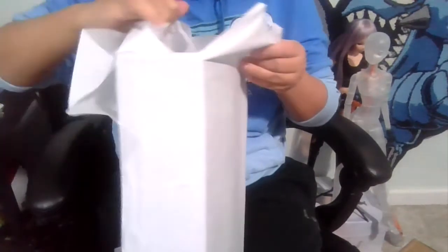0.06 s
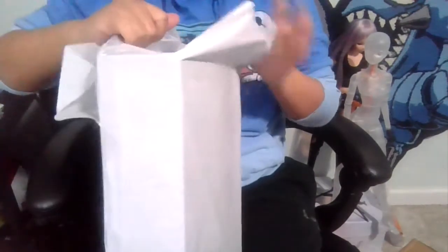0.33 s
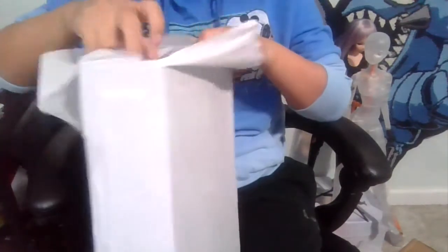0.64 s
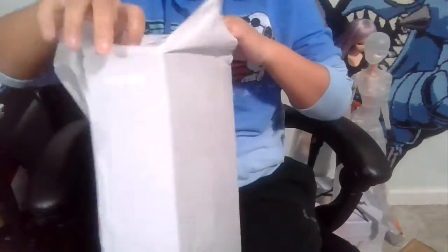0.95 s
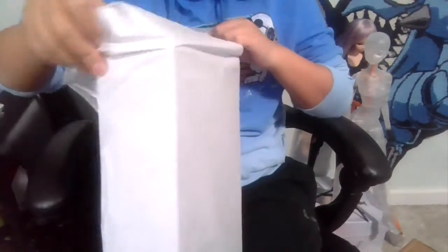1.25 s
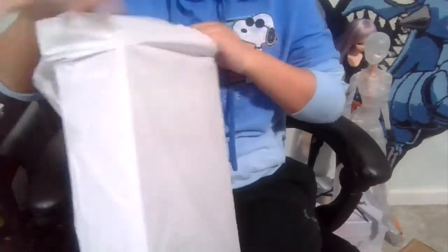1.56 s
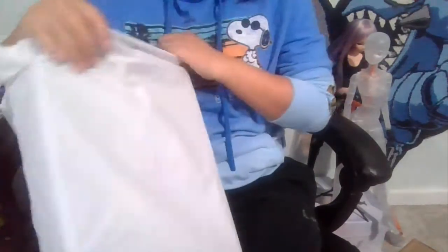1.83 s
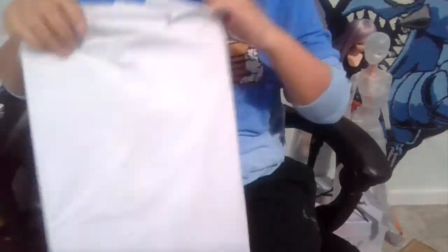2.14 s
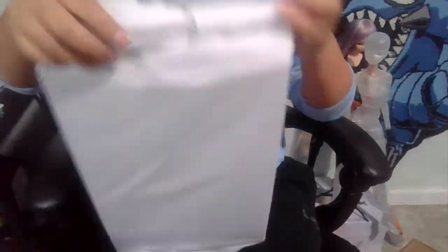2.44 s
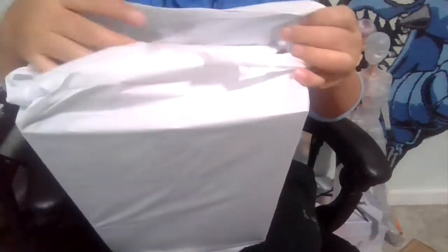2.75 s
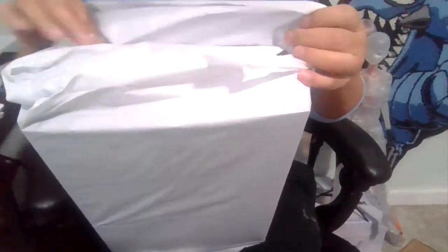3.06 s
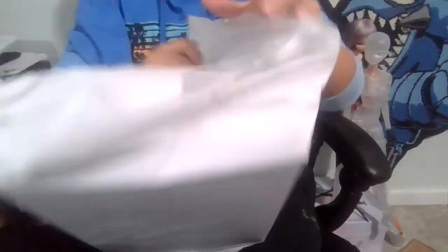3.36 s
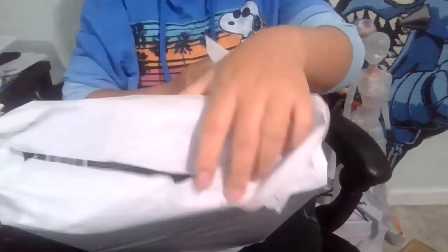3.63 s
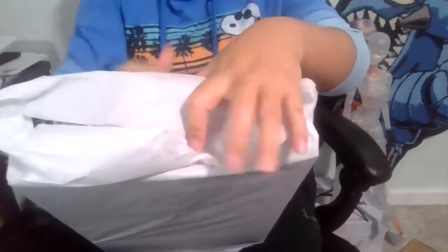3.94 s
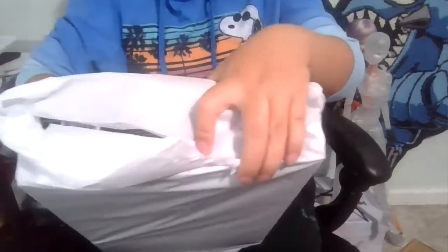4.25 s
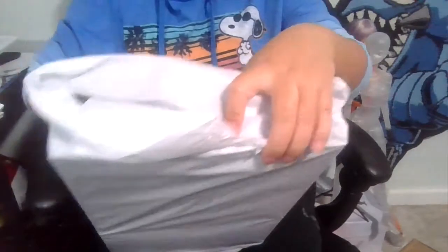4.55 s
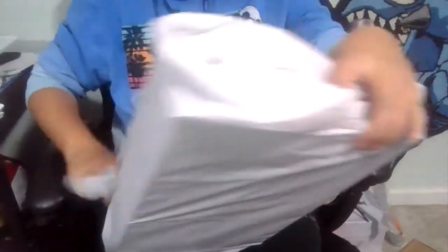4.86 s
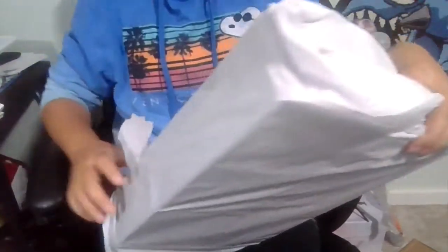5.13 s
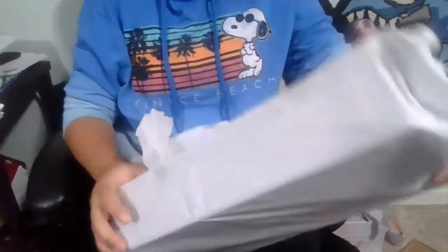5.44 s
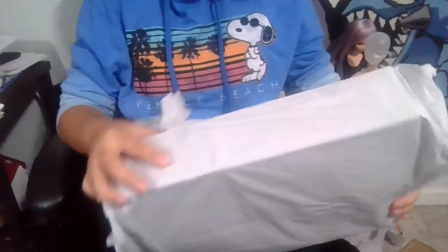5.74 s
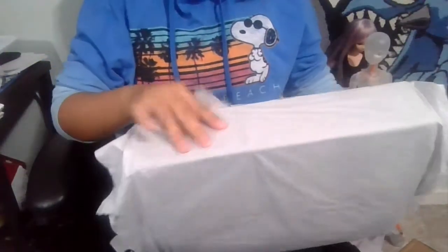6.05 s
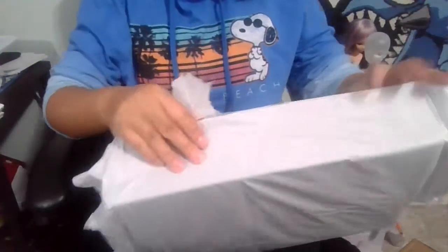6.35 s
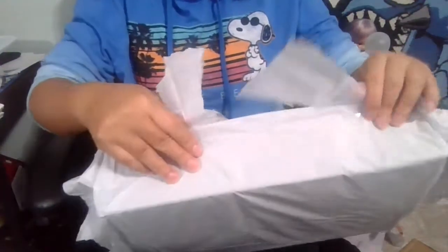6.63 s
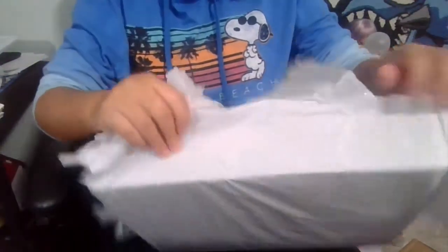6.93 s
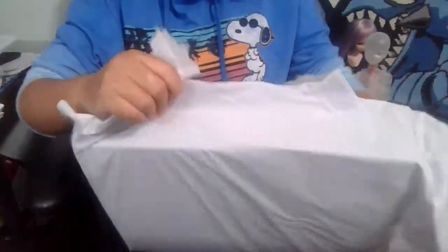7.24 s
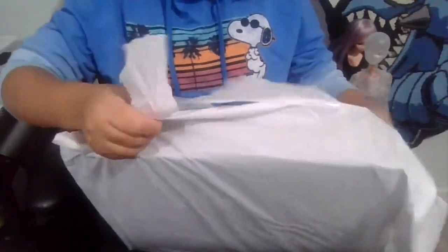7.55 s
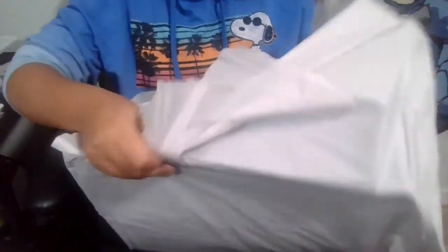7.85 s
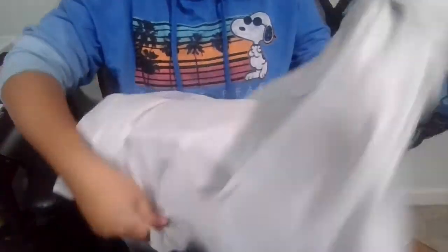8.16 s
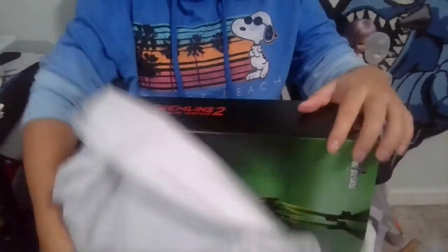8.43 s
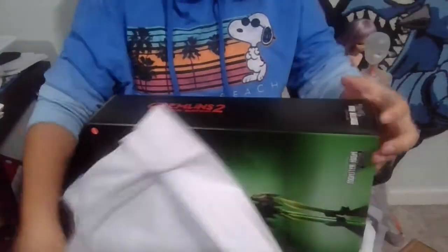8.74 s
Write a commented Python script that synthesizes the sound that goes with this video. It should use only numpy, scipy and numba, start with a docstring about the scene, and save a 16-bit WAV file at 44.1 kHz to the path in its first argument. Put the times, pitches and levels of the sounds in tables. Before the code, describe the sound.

Thin wrapping paper rustles in short, uneven strokes as hands work it off a cardboard box, close to a computer microphone in a small room. Over the first 2.7 seconds it crinkles and slides, with hollow hand bumps near 1 and 1.4 seconds and a sharp fold snap near 1.7. After a brief lull, the loudest crunching comes from 3.1 to 3.7 seconds, ending in several sharp snaps and a knock. The rustling then thins out, almost stopping around 5 seconds, with soft bumps as the box is turned. Crisp strokes and small snaps pick up again from about 5.5 seconds. A firm hollow thump lands at 7.3, followed by fuller, nearly continuous rustling with a snap at 7.8, easing off after 8.6 seconds. Faint steady room noise lies underneath throughout.

```python
"""Thin wrapping paper rustles as hands pull it off a cardboard box.
Each stroke buckles a swarm of tiny creases and drags paper over paper; loose flaps and the box ring along.
Single folds snap, and the hands bump the hollow box as they turn it.
A close computer microphone picks this up in a small room with faint steady noise."""
import sys
import numpy as np
from scipy import signal
from scipy.fft import rfft, irfft
from scipy.io import wavfile
from scipy.ndimage import uniform_filter1d
from numba import njit

SR = 44100
rng = np.random.default_rng(int(sys.argv[2]) if len(sys.argv) > 2 else 0)


def digitize_waveform(pressure):
    """Quantize a signal to 16-bit integers and store it at the path in sys.argv[1].

    Rows of a 2-D input are taken as channels; values are limited to [-1, 1].
    """
    field = np.atleast_2d(pressure).T
    bounded = np.clip(field, -1, 1)
    quanta = np.round(bounded * 32767).astype(np.int16)
    wavfile.write(sys.argv[1], SR, quanta)


N = 392049
T = np.arange(N) / SR
HZ = np.maximum(np.arange(N + 1) * SR / (2 * N), 1)


def undb(db):
    """Decibels to gain."""
    return 10 ** (np.asarray(db) / 20)


def unit(x):
    """Scale to rms 1."""
    return x / np.sqrt(np.mean(x ** 2))


def steady(x):
    """Level to unit power over a sliding 41 ms window."""
    return x / np.sqrt(np.abs(uniform_filter1d(x ** 2, size=1800)) + 1e-9)


def walk(rate_hz):
    """Random levels joined by lines; spread near 1."""
    return np.interp(T * rate_hz, np.arange(4096), rng.standard_normal(4096))


def add(out, start_s, sound):
    """Mix a sound in at start_s."""
    i = max(int(start_s * SR), 0)
    out[i:i + len(sound)] += sound[:N - i]


def blend(a, b, db):
    """Constant-power mix, b lying db over a."""
    return (a + undb(db) * b) / np.hypot(1, undb(db))


def spectrum(points):
    """Interpolate (f/Hz, level/dB) points onto HZ."""
    hz, db = np.transpose(points)
    return np.interp(np.log(HZ), np.log(hz), db)


def colour(x, gain_db):
    """Minimum-phase filter, gain_db given on HZ."""
    cepstrum = irfft(np.log(undb(gain_db)))
    cepstrum[1:N] *= 2
    cepstrum[N + 1:] = 0
    return irfft(rfft(x, 2 * N) * np.exp(rfft(cepstrum)))[:N]


def split(x, edges_hz):
    """Adjacent bands, each levelled to unit power."""
    bands = []
    for hz in edges_hz:
        low = signal.sosfiltfilt(signal.butter(6, hz, fs=SR, output="sos"), x)
        bands.append(steady(low))
        x = x - low
    return bands + [steady(x)]


@njit
def resonate(x, centre_hz, width_hz):
    """State-variable band-pass, gain 1 at its moving centre."""
    y, band_state, low_state = np.empty(len(x)), 0., 0.
    for i in range(len(x)):
        g, damping = np.tan(np.pi * centre_hz[i] / SR), width_hz / centre_hz[i]
        band = (band_state + g * (x[i] - low_state)) / (1 + g * (g + damping))
        band_state = 2 * band - band_state
        low_state += 2 * g * band
        y[i] = damping * band
    return y


def shifting_ring(x, ring_s, hop_samples):
    """Short random resonances that change with movement, each set fading into the next."""
    out, t = np.zeros(N), T[:3072]
    fade = np.sin(np.pi * np.arange(2 * hop_samples) / (2 * hop_samples))
    for i in range(0, N, hop_samples):
        ring = rng.standard_normal(len(t)) * np.exp(-t / ring_s)
        piece = x[i:i + 2 * hop_samples]
        add(out, i / SR, signal.fftconvolve(piece * fade[:len(piece)], ring / np.linalg.norm(ring)))
    return out


def burst(t, ring_s, gain):
    """Decaying noise burst, peak 1, filtered by a gain given on HZ."""
    noise = rng.standard_normal(len(t)) * t * np.exp(-t / ring_s)
    bins_hz = np.fft.rfftfreq(len(t), 1 / SR)
    shaped = irfft(rfft(noise) * np.interp(bins_hz, HZ, gain))
    return shaped / np.abs(shaped).max()


# room noise spectrum: f/Hz, level/dB
NOISE_SPECTRUM = [(60, -33), (160, -3.5), (400, -12.5), (3000, -18), (7600, -19.5)]


def room_noise(level_db):
    """Steady low rush with faint hiss."""
    return undb(level_db) * unit(colour(rng.standard_normal(N), spectrum(NOISE_SPECTRUM)))


def room_echo(x, decay_s, wet_db):
    """Desk and near walls add a short echo that shifts as the box moves."""
    return x + undb(wet_db) * shifting_ring(x, decay_s, hop_samples=5000)


# response of the wrapped box: f/Hz, level/dB
PARCEL_SPECTRUM = [(60, -36.5), (110, -23.5), (170, -6), (260, -1.5), (520, 0), (700, -4.5), (860, -10),
                   (1040, -4.5), (1400, -6.5), (1560, -11), (1850, -8.5), (2750, -9.5), (3700, -0.5),
                   (7400, -4)]
# flap and crease resonances: f/Hz, width/Hz, level/dB
SHEET_MODES = [(1311, 250, 7.5), (2190, 510, 12), (6250, 2860, 10.5)]


def bending_sheet(x, wander_octaves, bend_rate_hz):
    """The wrapped box colours x; each resonance wanders on its own as the paper bends."""
    x = colour(x, spectrum(PARCEL_SPECTRUM))
    for hz, width_hz, db in SHEET_MODES:
        centre_hz = hz * 2 ** (wander_octaves * walk(bend_rate_hz))
        x = x + (undb(db) - 1) * resonate(x, centre_hz, float(width_hz / undb(db / 2)))
    return x


def parcel_gain():
    """Gain of the wrapped box on HZ, resonances held still."""
    modes_db = sum(db / (1 + (2 * (HZ - hz) / width_hz) ** 2) for hz, width_hz, db in SHEET_MODES)
    return undb(spectrum(PARCEL_SPECTRUM) + modes_db)


def box_jolt(start_s, level_db, hz, decay_s):
    """The strongest bump knocks the desk and microphone: one deep, quickly damped thud."""
    t = np.maximum(T - start_s, 0)
    return undb(level_db) * t / decay_s * np.exp(1 - t / decay_s) * np.sin(2 * np.pi * hz * t)


# hand bumps on the box: t/s, level/dB, wall f/Hz, knuckle hardness/dB
BOX_BUMPS = [(0.23, -28, 171, 2), (0.964, -14.5, 256, -1), (1.311, -20, 410, 6), (1.365, -14, 362, -2),
             (1.445, -30, 187, 0), (1.749, -31, 165, -6), (1.896, -23, 250, 5), (2.356, -26.5, 178, -9),
             (3.666, -17.5, 227, -3), (3.712, -24.5, 193, -10), (3.872, -29.5, 160, -18),
             (4.14, -25.5, 230, -6), (4.78, -30, 161, -14), (5.081, -32.5, 163, -21),
             (5.34, -27.5, 240, -10), (5.607, -28, 260, -7), (5.714, -21.5, 557, -5),
             (6.298, -31, 152, -12), (6.321, -34, 160, -14), (6.528, -27, 220, 1), (6.603, -32, 158, -9),
             (7.136, -23.5, 287, -4), (7.272, -13.5, 376, -0.5), (8.727, -30, 159, -12)]


def box_bumps(cycles, bend, knock_s, knock_hz, shudder_s, shudder_hz, shudder_db):
    """A hand swings a cardboard wall and damps it; a knuckle knocks; the box shudders on."""
    out, t, parcel = np.zeros(N), T[:4096], parcel_gain()
    knock_gain = parcel / np.hypot(1, (HZ / knock_hz) ** 2)
    shudder_gain = parcel / np.hypot(1, (HZ / shudder_hz) ** 2)
    for start_s, level_db, wall_hz, hard_db in BOX_BUMPS:
        swings = cycles * undb(-0.17 * hard_db)  # longer under a soft palm
        age = np.minimum(t * wall_hz / swings, 1)
        pitch_hz = wall_hz * (1 + bend * (rng.random() - .5) * np.cos(np.pi * age))
        wall = np.sin(np.pi * age) ** 2 * np.sin(2 * np.pi * (np.cumsum(pitch_hz) / SR + rng.random()))
        knock = undb(hard_db) * burst(t, knock_s, knock_gain)
        shudder = undb(shudder_db) * burst(t, shudder_s, shudder_gain)
        add(out, start_s, undb(level_db) * (wall + knock + shudder))
    return out


# snapping folds: t/s, level/dB, f/Hz
FOLD_SNAPS = [(0.032, -22, 2040), (0.323, -28, 1800), (0.724, -12, 5000), (0.967, -21, 1150),
              (1.123, -17, 4200), (1.669, -8.5, 1710), (2.946, -28.5, 5970), (3.525, -6, 2250),
              (3.545, -3, 2170), (3.668, 0.5, 2730), (4.182, -12, 4060), (5.66, -21.5, 2800),
              (6.095, -18, 6460), (6.231, -22.5, 5960), (6.527, -14.5, 4570), (6.59, -23, 2140),
              (6.743, -13, 3000), (7.332, -13, 2270), (7.506, -20, 4340), (7.795, -5.5, 4600)]


def fold_snaps(ring_s, width_octaves, gain_db):
    """A stiff fold flips through: a few milliseconds of noise around its own pitch."""
    out, parcel = np.zeros(N), parcel_gain()
    for peak_s, level_db, pitch_hz in FOLD_SNAPS:
        gain = parcel / (1 + (np.log2(HZ / pitch_hz) / width_octaves) ** 2)
        add(out, peak_s - ring_s, undb(level_db + gain_db) * burst(T[:1024], ring_s, gain))
    return out


def sliding(rough_db, slip_rate_hz):
    """Paper drags over paper in small uneven slips."""
    return unit(rng.standard_normal(N) * undb(rough_db * walk(slip_rate_hz)))


def buckling(rate_hz, spread_db):
    """Creases buckle at random: many small clicks, few large ones."""
    chance = rng.random(N) * SR / rate_hz
    sign = np.sign(rng.standard_normal(N))
    size = undb(spread_db * np.minimum(-np.log(chance + 1e-9), 5))
    return unit((chance < 1) * sign * size / np.sqrt(rate_hz))


def crease_ticks(rate_hz, spread_db, ring_s, low_hz, high_hz):
    """Single stiff creases flip, each a tiny ping at its own pitch."""
    out, t = np.zeros(N), T[:256]
    clicks = buckling(rate_hz, spread_db)
    pitch_hz = low_hz + (high_hz - low_hz) * rng.random(N)
    ring = t * np.exp(-t / ring_s)
    for i in np.flatnonzero(clicks):
        add(out, T[i], clicks[i] * ring * np.sin(2 * np.pi * pitch_hz[i] * t))
    return unit(out)


def stroke_envelope(t, swell_s, hold_s):
    """Fingers catch the paper at t = 0; the pull swells, slackens and lets go; the paper settles."""
    catch_db, swell_db, slacken_db = 4, 13, 4
    release_db_per_s, settle_db, settle_db_per_s = 513, -10.5, 78
    gather_db = swell_db * np.minimum(t / swell_s - 1, 0) - catch_db * (t < 0)
    slack_db = slacken_db * np.clip((t - swell_s) / hold_s, 0, 1)
    free_s = np.maximum(t - swell_s - hold_s, 0)
    release = np.hypot(undb(-release_db_per_s * free_s), undb(settle_db - settle_db_per_s * free_s))
    return undb(gather_db - slack_db) * release / release[0]


# hand strokes: t/s, swell/s, hold/s, level/dB, box coupling/dB,
# crispness (creases over flaps)/dB, flap size (wide over narrow)/dB
HAND_STROKES = [(0.006, 0.038, 0.058, -28.5, -13, 1.5, -6.5), (0.12, 0.022, 0.1, -28.5, -10, 2, -7),
                (0.314, 0.015, 0.1, -34.5, -11.5, 3, 0.5), (0.56, 0.026, 0.016, -34.5, -11.5, 4, 2),
                (0.668, 0.071, 0.11, -21.5, -11.5, 6.5, -1.5), (0.873, 0.033, 0.21, -35, -8, -0.5, 0.5),
                (1.005, 0.11, 0.026, -24.5, -13.5, 6, -3), (1.145, 0.032, 0.023, -22.5, -7.5, 1.5, 1.5),
                (1.212, 0.079, 0.13, -26.5, -9.5, 2, 1.5), (1.45, 0.27, 0.024, -32.5, -8.5, 1, 3.5),
                (1.632, 0.034, 0.056, -23.5, -11, -0.5, 8), (1.801, 0.019, 0.11, -25.5, -4.5, 1, 8),
                (1.942, 0.027, 0.082, -37.5, -4.5, -1.5, 14), (2.056, 0.073, 0.22, -30.5, -9.5, 5, 6),
                (2.265, 0.17, 0.13, -26, -7, 1, 2.5), (2.545, 0.056, 0.082, -21.5, -6, -2.5, -2),
                (2.728, 0.0087, 0.04, -34, -2.5, -4, -6), (2.919, 0.061, 0.094, -46.5, -14, 6, -10),
                (3.097, 0.014, 0.046, -24, -6.5, -2.5, -3.5), (3.196, 0.03, 0.049, -18, -7, 0.5, -1),
                (3.274, 0.028, 0.025, -19.5, -10, -5, -7), (3.318, 0.057, 0.095, -25, -6, -0.5, 10.5),
                (3.372, 0.094, 0.077, -16.5, -14, 1.5, -7), (3.538, 0.015, 0.032, -17, -3.5, 5, -4.5),
                (3.628, 0.034, 0.0042, -15.5, -10, 0.5, -3), (3.718, 0.12, 0.082, -27, -15.5, 9, -5),
                (3.929, 0.022, 0.047, -22.5, -17, 7, -6), (4.096, 0.02, 0.093, -26.5, -14, 7, -10),
                (4.318, 0.096, 0.046, -26.5, -4.5, 1, -0.5), (4.528, 0.018, 0.09, -35, -4.5, 3, -3),
                (4.684, 0.028, 0.015, -32, -4.5, 1, -3), (4.807, 0.009, 0.03, -26, -6.5, 6.5, -4),
                (4.843, 0.041, 0.042, -32, -11, 5.5, 3), (5.261, 0.014, 0.1, -43.5, -13, 7, -4),
                (5.409, 0.037, 0.02, -33.5, -13, 6, -8.5), (5.551, 0.05, 0.035, -31.5, -3, 7.5, -4),
                (5.656, 0.036, 0.022, -24.5, -11, 3, 3), (5.828, 0.14, 0.084, -37.5, -8.5, 2.5, -0.5),
                (6.048, 0.023, 0.083, -30.5, -12, 5, -1.5), (6.164, 0.022, 0.057, -41, -7, 17, 2),
                (6.23, 0.061, 0.026, -28, -14, 5.5, -6), (6.442, 0.071, 0.026, -27.5, -6, 4, -3),
                (6.572, 0.017, 0.071, -31, -12.5, 7, -8), (6.674, 0.058, 0.11, -30, -8.5, 3, -5.5),
                (6.879, 0.019, 0.079, -28.5, -7.5, 5, -2), (6.968, 0.065, 0.09, -24, -13, 4, 1.5),
                (7.195, 0.014, 0.11, -31.5, -7, -2.5, 4.5), (7.251, 0.034, 0.07, -24, -9.5, 1.5, -7),
                (7.363, 0.014, 0.073, -28, -6, 4.5, -3.5), (7.458, 0.051, 0.078, -22, -10.5, 7.5, 1),
                (7.612, 0.05, 0.098, -21, -7, 3.5, -1.5), (7.743, 0.046, 0.071, -21.5, -11, 4.5, -3),
                (7.882, 0.11, 0.15, -25, -13.5, 6, -1), (8.135, 0.098, 0.14, -21.5, -13, 5.5, -1.5),
                (8.364, 0.068, 0.11, -20.5, -8.5, 1.5, 1.5), (8.54, 0.09, 0.036, -27, -9, 2.5, -2),
                (8.751, 0.22, 0.039, -36.5, -10.5, 2, 4)]
# paper stirring under resting hands: level/dB, box coupling/dB, crispness/dB, flap size/dB
HANDS_AT_REST = (-59.5, -8.5, 8, -5)


def hands():
    """Level and grip (coupling, crispness, flap size) in dB; strokes add in power, which weights grip."""
    t = np.arange(0, T[-1], .001)
    rest_db, *rest_grip = HANDS_AT_REST
    power = np.full(len(t), undb(rest_db) ** 2)
    grip = np.outer(rest_grip, power)
    for start_s, swell_s, hold_s, level_db, *stroke_grip in HAND_STROKES:
        stroke_power = (undb(level_db) * stroke_envelope(t - start_s, swell_s, hold_s)) ** 2
        power += stroke_power
        grip += np.outer(stroke_grip, stroke_power)
    return [np.interp(T, t, control) for control in (10 * np.log10(power), *(grip / power))]


def paper_rustle():
    """Buckling and sliding sound through box, flaps and creases; stiff creases tick on top."""
    stroke_db, box_db, crisp_db, wide_db = hands()
    rate_hz = 1600 * undb(.5 * (stroke_db + 28.5))  # light touch ticks, hard pull crunches
    crinkle = shifting_ring(buckling(rate_hz, spread_db=2.0), ring_s=0.0018, hop_samples=1300)
    drag = shifting_ring(sliding(rough_db=-1.5, slip_rate_hz=280), ring_s=0.001, hop_samples=2600)
    drive = unit(crinkle) + undb(-4.0) * unit(drag)
    sheet = bending_sheet(drive, wander_octaves=0.079, bend_rate_hz=32)
    box, wide, narrow, coarse, fine = split(sheet, edges_hz=[880, 1650, 2750, 5100])
    flaps = blend(narrow, wide, wide_db) * undb(walk(70))
    # crisper paper and a lighter touch favour fine creases
    fine_db = 3.0 + 0.28 * crisp_db - 0.2 * (stroke_db + 21.0) + 0.74 * walk(14)
    ticks = crease_ticks(rate_hz / 4, spread_db=3.0, ring_s=0.00032, low_hz=2040, high_hz=7420)
    creases = blend(blend(coarse, fine, fine_db), ticks, db=-6.0) * undb(1.7 * walk(70))
    body = box * undb(box_db + 0.81 * walk(45))
    return undb(stroke_db) * (body + blend(flaps, creases, crisp_db))


def scene():
    """Paper and box in the room, the same in both channels."""
    paper = undb(-1.5) * paper_rustle() + fold_snaps(ring_s=0.00073, width_octaves=0.61, gain_db=0.5)
    bumps = box_bumps(cycles=3.78, bend=0.28, knock_s=0.0042, knock_hz=1110,
                      shudder_s=0.011, shudder_hz=380, shudder_db=-8.5)
    noise = room_noise(level_db=-55.0)
    jolt = box_jolt(start_s=7.272, level_db=-21, hz=30, decay_s=0.008)
    mono = room_echo(paper, decay_s=0.0086, wet_db=-2.0) + bumps + jolt + noise
    return np.array([mono, mono])


def record(dry):
    """The speech microphone rounds the loudest peaks, thins the bass and cuts the top."""
    low_hz, top_hz = 157, 7520
    highpass = signal.butter(3, low_hz, "high", fs=SR, output="sos")
    lowpass = signal.ellip(12, .1, 80, top_hz, fs=SR, output="sos")
    return signal.sosfilt(lowpass, signal.sosfilt(highpass, np.tanh(dry)))


dry = scene()
out = record(dry)
digitize_waveform(out)
```